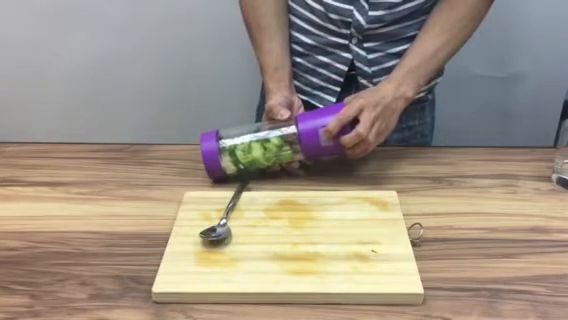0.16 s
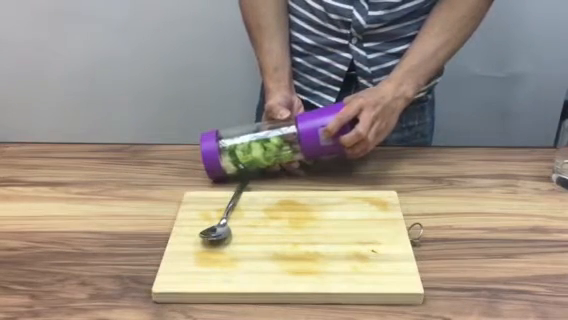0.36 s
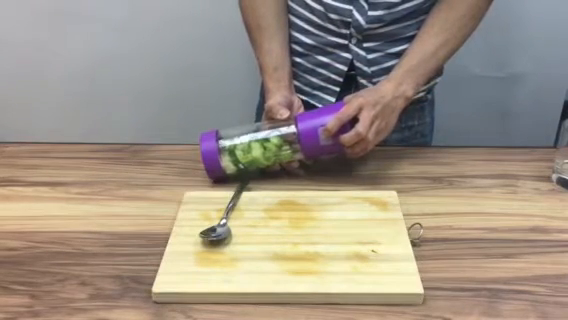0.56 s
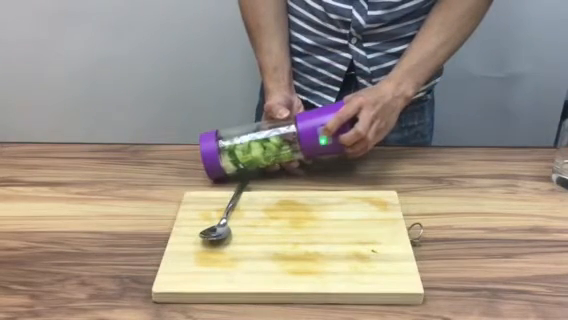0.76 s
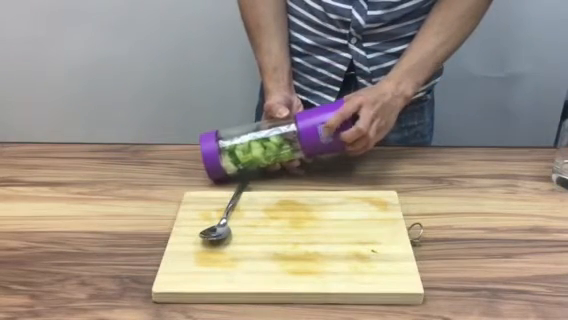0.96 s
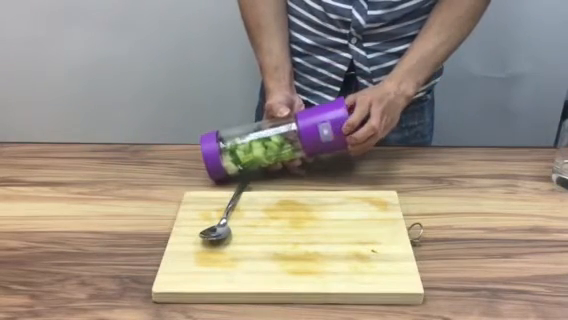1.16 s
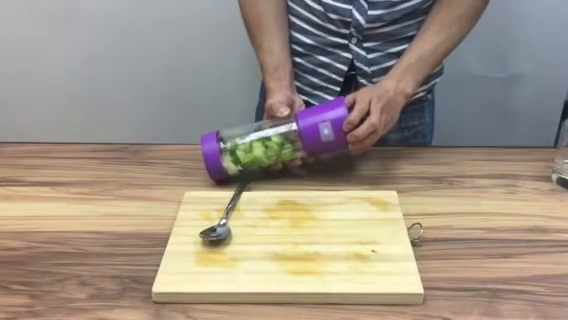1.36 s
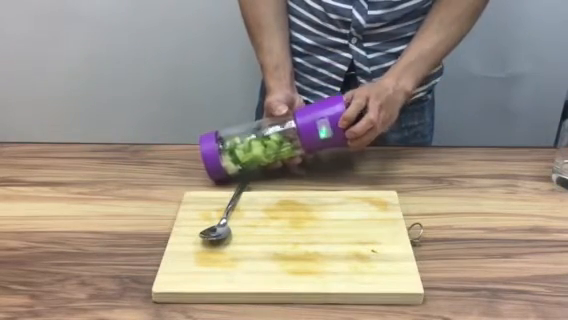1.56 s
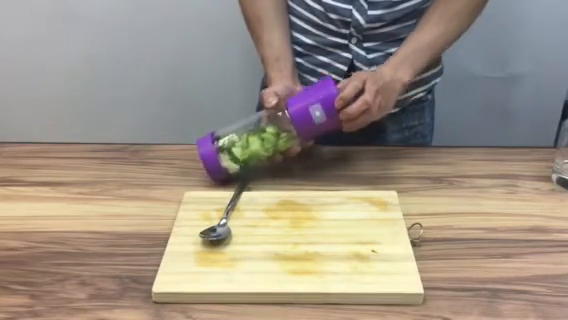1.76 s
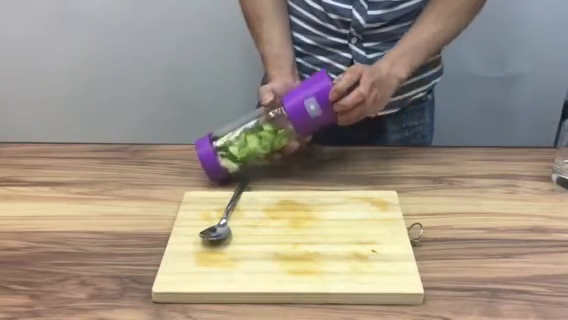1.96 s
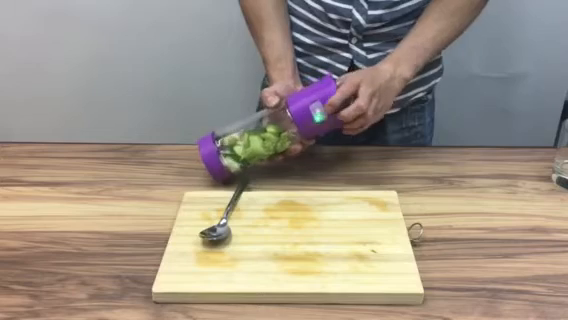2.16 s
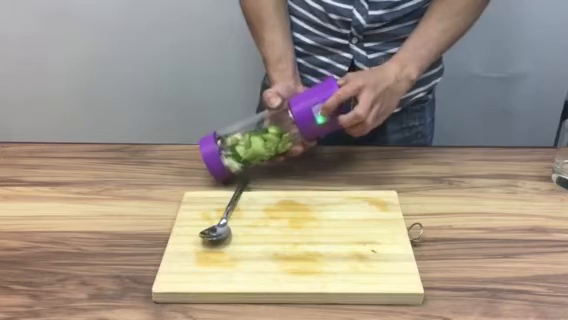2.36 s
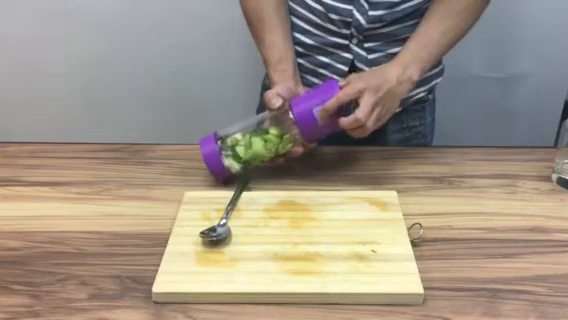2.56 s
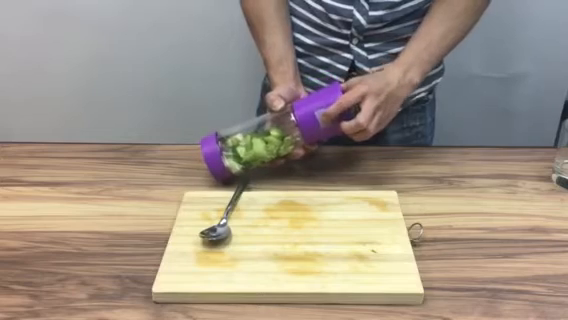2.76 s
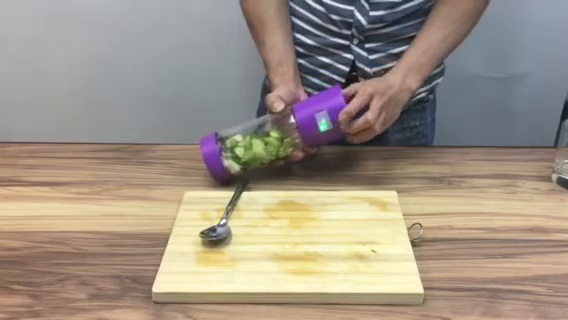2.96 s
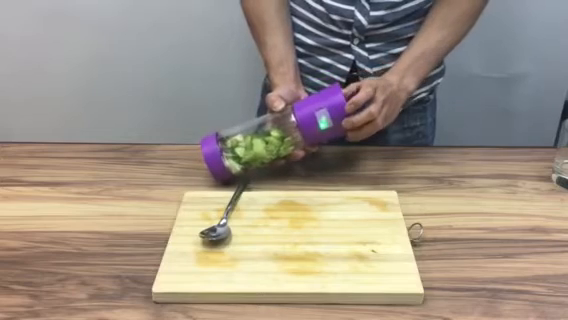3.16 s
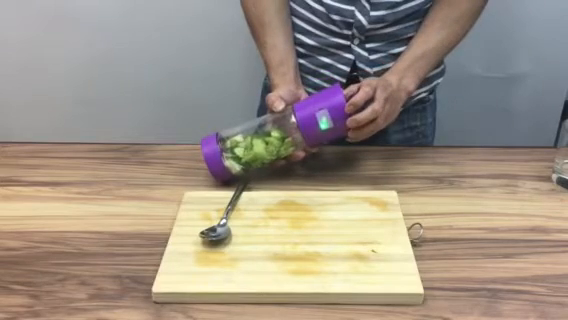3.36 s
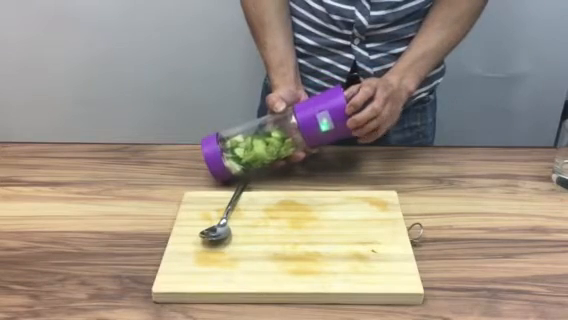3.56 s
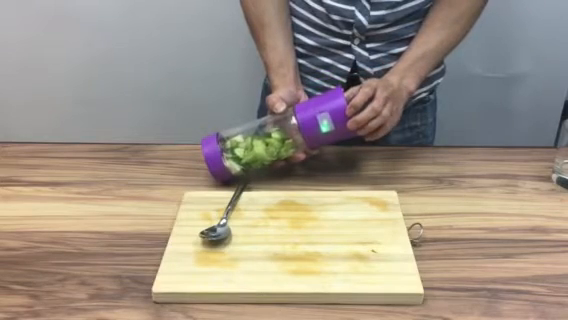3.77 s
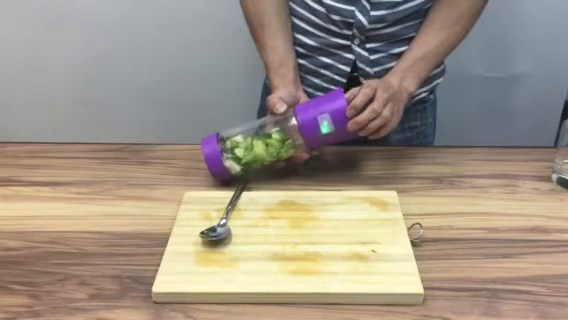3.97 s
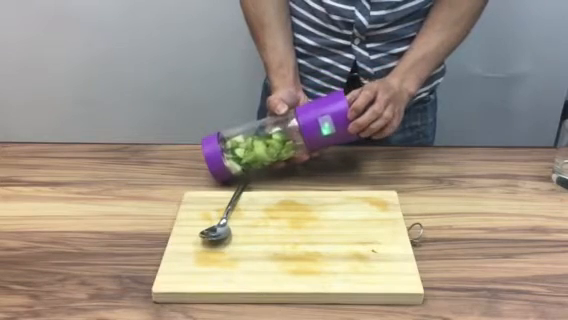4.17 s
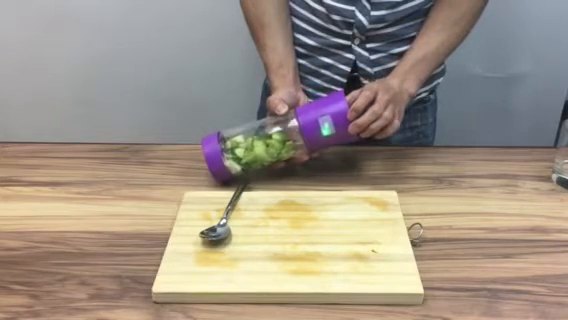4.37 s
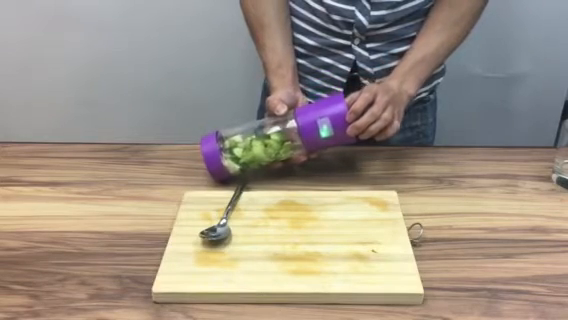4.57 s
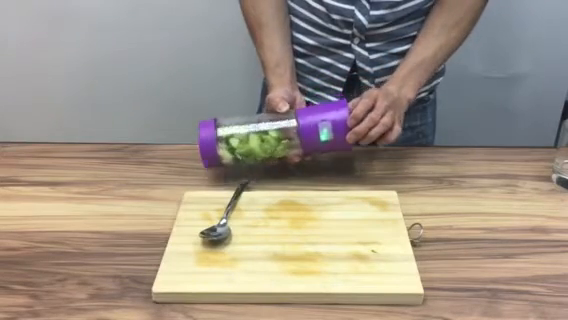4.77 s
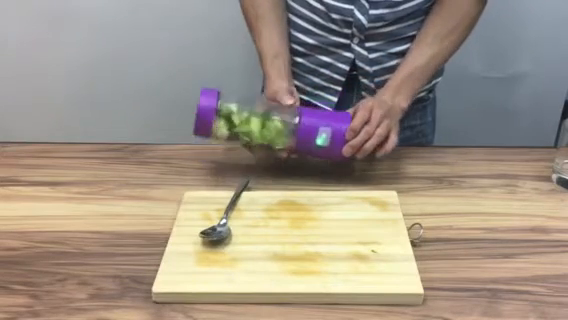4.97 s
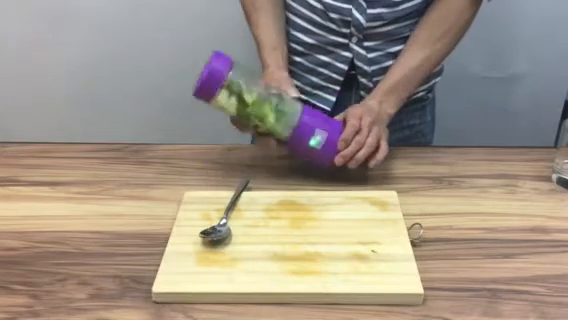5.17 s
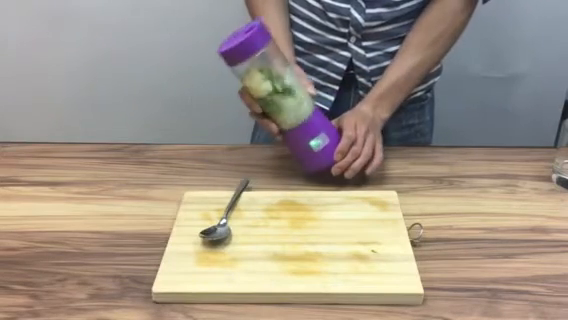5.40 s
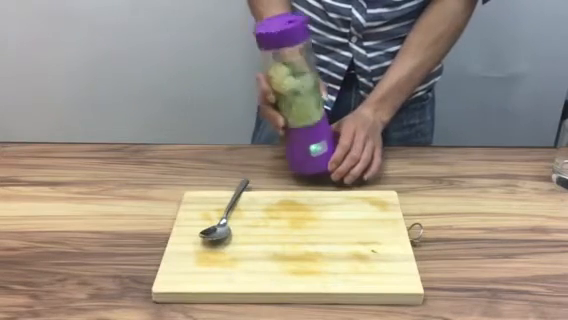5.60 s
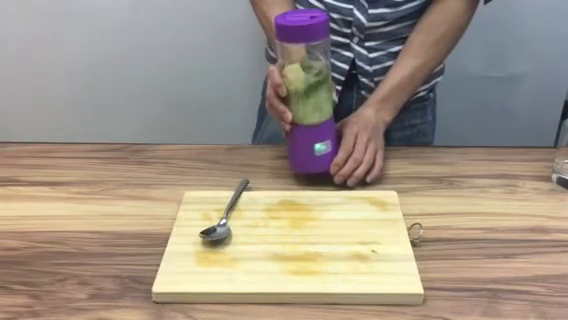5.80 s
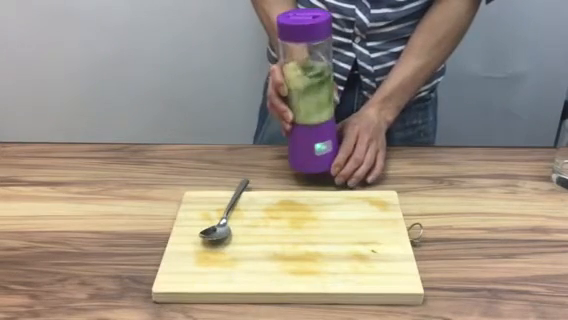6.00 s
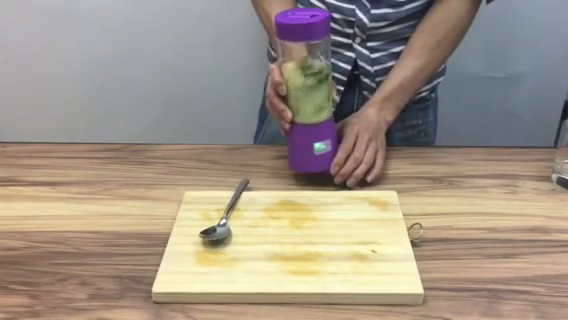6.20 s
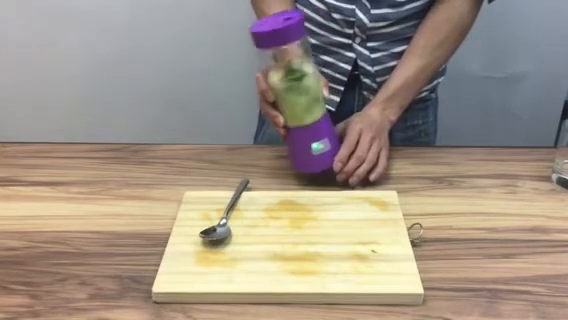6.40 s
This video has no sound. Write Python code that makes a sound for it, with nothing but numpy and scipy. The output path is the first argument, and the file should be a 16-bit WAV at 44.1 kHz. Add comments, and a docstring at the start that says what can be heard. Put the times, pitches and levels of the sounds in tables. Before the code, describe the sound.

After sparse plastic clicks in a quiet room, a small electric motor whirs steadily, then sags as vegetable chunks clatter violently on its blades.

```python
"""In a small room with a low rumble, a cordless blender is held on its side over a kitchen table.
It is clicked on, and its motor whines up to speed as a sum of harmonics of the shaft rotation.
As it is turned upright, vegetable chunks fall on the blades: the motor sags under the drag,
and trains of blows excite the modes of the plastic jar while filtered noise makes the spray."""
import sys
import numpy as np
from scipy import signal
from scipy.fft import rfft, irfft
from scipy.io import wavfile
from scipy.ndimage import uniform_filter1d

SR = 44100
rng = np.random.default_rng(int(sys.argv[2]) if len(sys.argv) > 2 else 0)


def master(y):
    """Save y as 16-bit WAV."""
    cut = np.clip(np.atleast_2d(y).T, -1, 1)
    pcm = np.round(cut * 32767)  # scale
    wavfile.write(sys.argv[1], SR, pcm.astype(np.int16))


N = 284004
T = np.arange(N) / SR  # time axis, s

# Spectrum of the room's rumble: [f/Hz, relative level/dB]
RUMBLE_SPECTRUM = [(20, -43), (30, -16), (45, -15.5), (60, -7), (80, -12.5), (105, -7), (130, -11.5),
                   (200, -9.5), (265, -17.5), (330, -16.5), (410, -19.5), (500, -35.5), (700, -46)]
# Spectrum of the room's faint hiss: [f/Hz, relative level/dB]
AIR_SPECTRUM = [(260, -26.5), (450, -3), (615, -3.5), (653, -9), (703, -5), (879, -4), (1120, -6),
                (1740, -7.5), (1880, -13), (1970, -10.5), (2980, -12.5), (4800, -19), (5740, -16.5),
                (14900, -29.5), (15800, -52)]
# Narrow drones in the room: [f/Hz, bandwidth of each of two filter stages/Hz, rms level/dB]
ROOM_DRONES = [(48.5, 6.2, -56.5), (62.5, 15, -51.5), (97.4, 12.7, -57.5), (333.2, 17, -66.5),
               (871, 8.4, -70.5), (1876, 18, -72.5)]
# Button clicks and ticks of the casing: [t/s, peak level/dB, treble against mids/dB, ring f/Hz]
CASING_CLICKS = [(0.4332, -38, -9, 2000), (0.97, -44, -5, 2500), (1.001, -24, 3.5, 3830),
                 (1.699, -38, -15, 3000), (1.853, -34, -13, 7000), (2.403, -38.5, -12, 2100),
                 (2.7223, -29.5, 1, 8650), (2.8945, -21.5, 0.5, 6260)]
# Spectrum of the button snap: [f/Hz, relative level/dB]
BUTTON_SPECTRUM = [(300, -24), (500, -9), (1400, -8), (2100, -4), (2800, -6), (3700, 0), (4700, -1),
                   (6200, -1), (7000, -6), (8900, -5), (10500, -16), (15500, -18)]
# Knocks of hands and sliding pieces: [t/s, peak level/dB, f/Hz, 60 dB decay of the exciting noise/s]
BODY_KNOCKS = [(.546, -47, 1590, .075), (.556, -46, 2400, .039), (.803, -50, 2020, 0.05),
               (1.17, -52, 1290, .03), (1.45, -53, 2900, .12), (1.815, -44.5, 630, 0.079),
               (3.572, -43, 680, .03), (3.675, -37.5, 135, 0.071), (4.79, -46, 2400, .14),
               (4.85, -45, 2487, 0.21), (4.899, -38.5, 5800, .06)]
# Modes of the plastic jar: [f/Hz, approximate half-power width/Hz, relative level/dB]
JAR_MODES = [(523, 88, -13), (636, 66, -7), (836, 153, -4), (952, 75, 0), (1164, 77, 6.5), (1235, 62, 2.5),
             (1365, 93, -3), (1537, 107, 1.5), (1784, 60, -3.5), (1884, 250, -3.5), (2140, 93, -3.5),
             (2374, 62, -4.5), (2690, 165, -12), (3450, 158.6, -20), (3956.6, 214, -41)]
# Spectrum of the dry crack of a blow: [f/Hz, relative level/dB]
CRACK_SPECTRUM = [(250, -32), (430, -17), (560, 10.5), (2300, 10), (2700, -4.5), (4000, 0.5), (5000, -8.5),
                  (9500, -5.5), (11000, -26), (15500, -29)]
# Big chunks hitting the blades: [t/s, relative level/dB]
CHUNK_HITS = [(3.571, -25), (4.905, -15.5), (5.292, -7.5), (5.362, -12), (5.449, -7), (5.468, -5.5),
              (5.584, -10), (5.712, -5), (5.768, -10), (5.86, 0), (5.984, -13), (6.105, -10), (6.159, -7.5),
              (6.232, -6.5), (6.3, -6), (6.347, -6.5), (6.411, -9)]
# Spectrum of the juice spray: [f/Hz, relative level/dB]
SPRAY_SPECTRUM = [(1500, -9.5), (3300, 13), (4500, 6), (5300, 2.5), (6200, 5), (7100, -2.5), (8200, 5),
                  (9200, 4), (9800, 7), (10300, -3), (12500, -4.5), (15500, -15)]
# The blades run into a pocket of air: [t/s, half length of the dip at 1/e/s, dip in level/dB]
AIR_POCKETS = [(5.152, 0.029, 3.5), (5.338, 0.025, 4.5), (5.532, 0.021, 5), (5.807, 0.013, 10),
               (5.848, .008, 3), (5.931, 0.018, 8.5), (6.075, 0.034, 4.5)]
# Drag of the food on the blades: [t/s, rotation frequency lost f/Hz]
FOOD_DRAG = [(4.5, 0), (4.95, 1.55), (5.08, 11.8), (5.21, 30.5), (5.28, 50), (5.42, 59), (5.54, 93),
             (5.65, 79), (6.03, 90), (6.25, 79)]
# Harmonics of the shaft at full speed: [multiple of the shaft frequency, relative level/dB]
SHAFT_ORDERS = [(2, -4.5), (3, -5), (4, -8), (6, -1.5), (8, 1), (9, -6.5), (10, -8), (11, -12.5), (12, -25),
                (13, -24.5), (14, -15), (15, -16.5), (16, -14), (17, -18), (19, -23), (20, -24), (21, -19),
                (24, -22.5), (25, -17.5), (28, -15.5), (30, -15.5), (31, -14.5), (32, -16.5), (33, -10.5),
                (35, -15.5), (37, -17), (38, -17.5), (39, -14.5), (40, -29), (41, -15.5)]
# The two strongest harmonics at free speed: [t/s, fifth order rms level/dB, seventh order rms level/dB]
LEADING_ORDERS = [(3.1, -54, -60.5), (3.212, -44.5, -58), (3.24, -46.5, -54), (3.358, -51, -47.5),
                  (3.542, -48, -45.5), (3.81, -47.5, -51.5), (4.132, -56, -52.5), (4.346, -49, -50),
                  (4.732, -49, -52), (4.85, -48.5, -50.5)]
# Spectrum of the brush noise: [f/Hz, relative level/dB]
BRUSH_SPECTRUM = [(400, -14), (1000, 7), (1500, 6.5), (2200, 9), (2700, -6), (3700, -0.5), (5000, -2),
                  (6200, -3), (9600, 1.5), (10500, -9.5), (15500, -20)]

RUMBLE_DB, AIR_DB = -52.5, -59.5  # rms; the hiss wavers slightly about its level
TOP_HZ = 15850
# chopping grows with the drag until the blades are buried, then eases as the pieces get smaller
CONTACT_S, BURIED_DRAG_HZ = 4.972, 56
LIGHT_BLOWS_DB, BURIED_BLOWS_DB = -38.5, -27
LIGHT_SPRAY_DB, BURIED_SPRAY_DB = -49, -40
MINCED_S, BLOWS_EASE_DB_PER_S, SPRAY_EASE_DB_PER_S = 5.5, 5.5, 7
# the shaft leaps towards its free speed, then creeps up the last few turns per second
START_S, FREE_HZ, SPIN_UP_S = 2.962, 217.55, 0.059
CREEP_HZ, CREEP_S = 9, 0.35
FULL_SPEED_HZ = 217  # speed to which the harmonic levels refer
HOWL_S = 0.165  # how long the starting current howls
# offsets added to the relative levels of the low, middle and treble orders
LOW_DB, MIDDLE_DB, TREBLE_DB = -50.5, -49, -50.8
# just after the start the middle orders rasp and the low ones are slow to build
SETTLE_S, START_RASP_DB, START_LAG_DB = 0.39, 5, 7


def undb(db):
    """Logarithmic level: 20 dB are a factor of ten in amplitude."""
    return 10 ** (np.asarray(db) / 20)


def unit(x):
    """Normalization: division by the root mean square gives rms 1."""
    return x / np.sqrt(np.mean(x ** 2))


def steady(x, span):
    """Short-time normalization: a running mean over span seconds holds the rms at 1."""
    power = np.abs(uniform_filter1d(x ** 2, int(span * SR)))
    return x / np.sqrt(power + 1e-12)


def curves(rows):
    """Linear interpolation: each column after t/s becomes a curve over time."""
    s, *columns = np.transpose(rows)
    return [np.interp(T, s, c) for c in columns]


def fade_in(start, length):
    """Linear envelope: a ramp from 0 to 1, start and length in seconds."""
    return np.clip((T - start) / length, 0, 1)


def walk(rate):
    """Random modulation: Gaussian values, rate per second, joined by lines; spread near 1."""
    values = rng.standard_normal(2048)
    return 1.2 * np.interp(T * rate + rng.random(), np.arange(2048), values)


def colour(x, points):
    """Minimum-phase filtering: the cepstrum of a (f/Hz, level/dB) curve gives a causal response."""
    size = 4096
    hz, db = np.transpose(points)
    bins_hz = np.fft.rfftfreq(size, 1 / SR) + 1
    log_gain = np.log(undb(np.interp(np.log(bins_hz), np.log(hz), db)))
    cepstrum = irfft(log_gain)[:size // 2]
    cepstrum[1:] *= 2  # fold the anticausal half onto the causal one
    response = irfft(np.exp(rfft(cepstrum, size)))
    return signal.fftconvolve(x, response)[:len(x)]


def resonate(x, hz, width_hz):
    """Simple resonance: a second-order peak with gain 1 at its centre."""
    return signal.lfilter(*signal.iirpeak(hz, hz / width_hz, fs=SR), x)


def burst(t60):
    """Exponential decay: noise falls by 60 dB in t60 seconds."""
    t = T[:SR // 4]
    return rng.standard_normal(len(t)) * undb(-60 * t / t60)


def add(out, s, x):
    """Superposition: a sound is summed in at time s."""
    i = int(s * SR)
    out[i:i + len(x)] += x[:N - i]


def room_tone():
    """Stationary noise: broadband rumble and faint hiss, with narrow bands heard as drones."""
    rumble = unit(colour(rng.standard_normal(N), RUMBLE_SPECTRUM)) * undb(RUMBLE_DB)
    air = unit(colour(rng.standard_normal(N), AIR_SPECTRUM)) * undb(AIR_DB + 0.14 * walk(4.4))
    drones = 0
    for hz, width, db in ROOM_DRONES:
        band = resonate(resonate(rng.standard_normal(N), hz, width), hz, width)
        drones = drones + undb(db) * unit(band)
    return rumble + air + drones


def room(x, wet_db=-10, t60=0.19):
    """Reverberation: table and near walls return a short, dense echo as decaying noise."""
    tail = colour(burst(t60), [(200, -10), (1500, 5), (6000, -0.5), (14000, -4.0)])
    delayed_tail = np.pad(tail, (int(.004 * SR), 0))
    echo = signal.fftconvolve(x, delayed_tail)[:N]
    return x + undb(wet_db) * echo / np.sqrt(np.sum(tail ** 2))


def handling(click_db=0, knock_db=0, ring_db=-2):
    """Impact excitation: button snaps ring the casing; hands and sliding pieces knock on the body."""
    out = np.zeros(N)
    for s, db, treble_db, ring_hz in CASING_CLICKS:
        decay = burst(0.013) + undb(-10.0) * burst(0.028) + undb(-22.5) * burst(0.13)
        snap = colour(decay, BUTTON_SPECTRUM)
        ringing = snap + undb(ring_db) * resonate(snap, ring_hz, ring_hz / 2)
        snap = colour(ringing, [(2000, 0), (9000, treble_db)])
        add(out, s, undb(db + click_db) * snap / np.abs(snap).max())
    for s, db, hz, ring_s in BODY_KNOCKS:
        knock = resonate(resonate(burst(ring_s), hz, hz / 3), hz, hz / 3)
        add(out, s, knock * undb(db + knock_db) / np.abs(knock).max())
    return out


def jar_ring(push, detune, crack_db=-19):
    """Modal response: the plastic jar answers a blow with a dry crack and its resonances."""
    hz = np.geomspace(100, SR / 2, 600)
    power = undb(crack_db + np.interp(hz, *np.transpose(CRACK_SPECTRUM))) ** 2
    for centre, width, db in JAR_MODES:
        offset = (hz - centre * (1 + detune)) / (.75 * width)
        power += undb(db) ** 2 / (1 + offset ** 2) ** 2
    return colour(push, np.transpose([hz, 10 * np.log10(power)]))


def jar(push, bare_db=4):
    """Loaded resonator: food detunes the modes, bounces smear each blow, pulp damps the upper modes."""
    # shifting food leans the response between modes 1.7 % sharp and 1.7 % flat
    lean = .5 + .5 * np.tanh(2 * walk(14))
    ring = lean * jar_ring(push, .017) + (1 - lean) * jar_ring(push, -.017)
    for bounce_s in (.0004, .0007, .0011):
        allpass = np.r_[.5, np.zeros(int(bounce_s * SR)), 1]
        ring = signal.lfilter(allpass, allpass[::-1], ring)
    bare = colour(ring, [(600, 0.0), (1150, -4.0), (1800, bare_db + 1), (4500, bare_db), (9000, -6)])
    pulp = fade_in(5.155, 0.31)
    return (1 - pulp) * bare + pulp * ring


def chunks(gain_db=8, scrape_db=-17, scrape_s=0.063, again_db=-3):
    """Impulse and friction: a big piece is hit, caught by the next blade, and scrapes along the wall."""
    push = np.zeros(N)
    for s, db in CHUNK_HITS:
        blow = undb(scrape_db) * burst(scrape_s)
        blow[0] += 2
        blow[SR // 270] += 2 * undb(again_db)  # the second hit, 3.7 ms later
        add(push, s, blow * undb(db + gain_db))
    return jar(push)


def chop_levels(drag):
    """Work of cutting: blow and spray levels follow the drag, ease with time and dip in air pockets."""
    bite = np.sqrt(np.clip(drag / BURIED_DRAG_HZ, 0, 1))
    mincing = np.maximum(T - MINCED_S, 0)
    dip_db = sum(db * np.exp(-((T - s) / half) ** 2) for s, half, db in AIR_POCKETS)
    blows_db = LIGHT_BLOWS_DB + (BURIED_BLOWS_DB - LIGHT_BLOWS_DB) * bite - BLOWS_EASE_DB_PER_S * mincing
    spray_db = LIGHT_SPRAY_DB + (BURIED_SPRAY_DB - LIGHT_SPRAY_DB) * bite - SPRAY_EASE_DB_PER_S * mincing
    return blows_db - dip_db, spray_db - dip_db


def blade_blows(turns, packed, scatter_db=4.0, second_blade_db=-6):
    """Periodic impact: two blades strike every turn, less evenly as the jar fills."""
    passes = np.flatnonzero(np.diff(np.floor(2 * turns)))
    late, size = rng.standard_normal((len(passes), 2)).T
    jitter_s = .00008 + .0003 * packed[passes]
    at = np.clip(passes + (late * jitter_s * SR).astype(int), 0, N - 1)
    blade = np.arange(len(at)) % 2
    blows = np.zeros(N)
    blows[at] = undb(scatter_db * np.clip(size, -2, 1.2) + second_blade_db * blade)
    return blows


def pelting_bits(packed, bits_per_s=1100, bits_db=-15, bit_scatter_db=4):
    """Random impact: cut bits pelt the wall at chance moments, more densely as the jar fills."""
    hits = rng.random(N) < bits_per_s * (.3 + .7 * packed) / SR
    bits = hits * rng.choice([-1, 1], N)
    return bits * undb(bits_db + bit_scatter_db * rng.standard_normal(N))


def juice_spray(push):
    """Turbulent noise: each cut tears on for a moment, and the steel blades ring until pulp coats them."""
    tearing = signal.lfilter([1], [1, -np.exp(-1 / (0.0021 * SR))], push ** 2)
    spray = colour(np.sqrt(tearing) * rng.standard_normal(N), SPRAY_SPECTRUM)
    blade_ring = resonate(spray, 8160, 300) + resonate(spray, 9300, 200)
    spray += (1 - fade_in(5.047, 0.4)) * 0.71 * blade_ring
    # the pulp muffles the finest spray
    thick = fade_in(5.0, 0.59)
    return (1 - thick) * spray + thick * colour(spray, [(9700, -5.5), (12500, -12.0)])


def chopping(turns, drag, tumble_db=4):
    """Forced vibration: blows and bits drive the jar, and the same force sets off the spray."""
    force_db, spray_db = chop_levels(drag)
    packed = fade_in(5.42, .15)
    push = blade_blows(turns, packed) + pelting_bits(packed)
    # tumbling pieces feed the blades in fits
    push = push * undb(tumble_db * (0.13 + 0.92 * packed) * np.tanh(walk(60)))
    spray = juice_spray(push)
    rattle = steady(jar(push), .06) * undb(force_db) + steady(spray, 0.037) * undb(spray_db)
    return fade_in(CONTACT_S, .003) * rattle


def shaft_speed(drag):
    """Exponential approach: turns per second rise fast, then creep, less the drag of the food."""
    running = np.maximum(T - START_S, 0)
    leap = (FREE_HZ - CREEP_HZ) * np.exp(-running / SPIN_UP_S)
    creep = CREEP_HZ * np.exp(-running / CREEP_S)
    return np.maximum(FREE_HZ - leap - creep - drag, 0)


def shaft_whine(speed, angle, free, waver_db=2, high_waver_db=2.0):
    """Harmonic series: shaft orders sing, each wavering as the grip shifts."""
    settling = np.exp(-((T - START_S) / SETTLE_S) ** 2)
    whine = 0
    for order, _ in SHAFT_ORDERS:
        # the housing favours fixed pitches, so each order swells as it glides through them
        db = np.interp(order * speed / FULL_SPEED_HZ, *np.transpose(SHAFT_ORDERS))
        if order < 10:
            db = db + LOW_DB - START_LAG_DB * settling + waver_db * walk(2.91)
            gain = undb(db) * free ** 3
        elif order < 24:
            db = db + MIDDLE_DB + START_RASP_DB * settling + waver_db * walk(2.81)
            gain = undb(db) * free ** 3
        else:
            db = db + TREBLE_DB + high_waver_db * walk(3.526)
            gain = undb(db) * free ** 6 * (1 - fade_in(4.93, 0.38))
        whine = whine + gain * np.sin(round(order) * angle + 2 * np.pi * rng.random())
    fifth_db, seventh_db = curves(LEADING_ORDERS)
    lead = undb(fifth_db) * np.sin(5 * angle) + undb(seventh_db) * np.sin(7 * angle)
    return whine + np.sqrt(2) * np.minimum(free, fade_in(START_S, HOWL_S)) * lead


def brush_noise(turns, free, brush_db=-57.5):
    """Amplitude modulation: brush hiss pulses once a turn; below free speed it grows and scrapes."""
    pulse = np.exp(-free * (turns % 1) / 2.0)
    brushes = unit(colour(rng.standard_normal(N) * pulse, BRUSH_SPECTRUM))
    scrape = unit(resonate(brushes, 1340, 260)) * undb(-50.5) * (1 - free)
    hiss = brushes * undb(brush_db + 8.1 * (1 - free))
    return scrape + hiss


def motor(speed, turns):
    """Rotating source: harmonics locked to the shaft angle join the friction noise of the brushes."""
    angle = 2 * np.pi * turns + .007 * walk(150)  # slight phase jitter, rad
    free = np.clip(speed / 213, 0, 1)
    whine = shaft_whine(speed, angle, free)
    # the starting current makes the fifth order howl
    starting = np.sqrt(1 - free) * (T < START_S + HOWL_S)
    whine += undb(-42.0) * starting * np.sin(10 * np.pi * turns)
    return whine * fade_in(2.99, 0.041) + brush_noise(turns, free) * fade_in(2.93, 0.12)


def scene():
    """Common drive: one shaft governs both the whine and the chopping."""
    drag, = curves(FOOD_DRAG)
    speed = shaft_speed(drag)
    turns = np.cumsum(speed) / SR
    impacts = chopping(turns, drag) + chunks() + handling()
    return (motor(speed, turns) + room(impacts) + room_tone())[None]


def record(dry):
    """Band limitation: a steep elliptic low-pass removes the top of the spectrum."""
    low_pass = signal.ellip(10, .2, 70, TOP_HZ, fs=SR, output="sos")
    return signal.sosfilt(low_pass, dry)


dry = scene()
out = record(dry)
master(out)
```